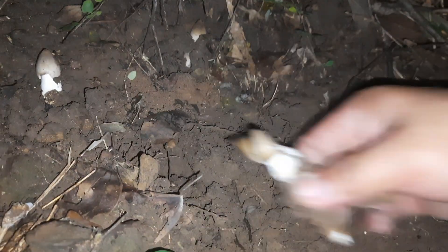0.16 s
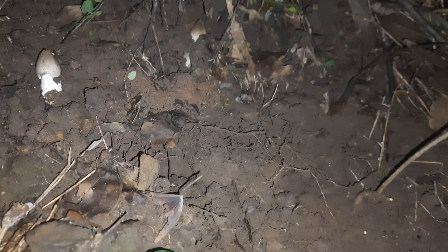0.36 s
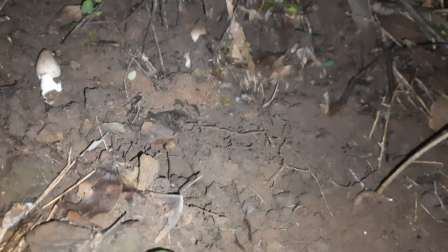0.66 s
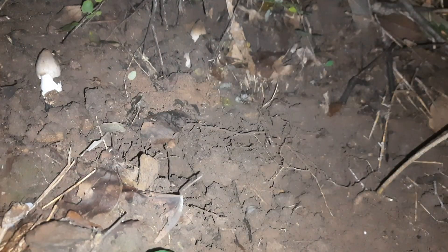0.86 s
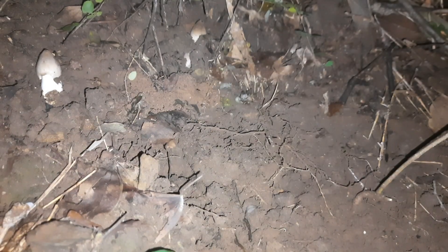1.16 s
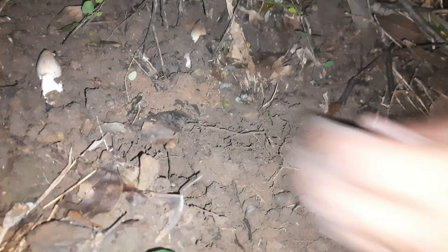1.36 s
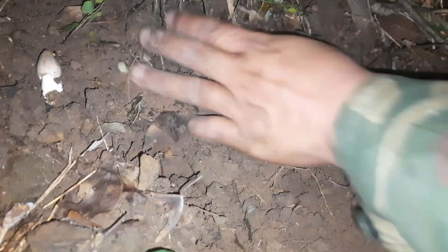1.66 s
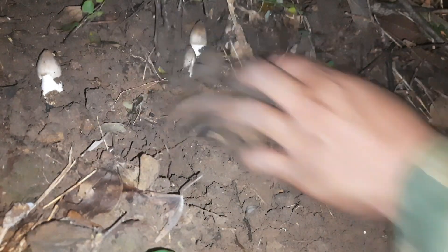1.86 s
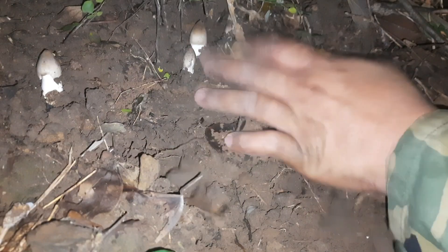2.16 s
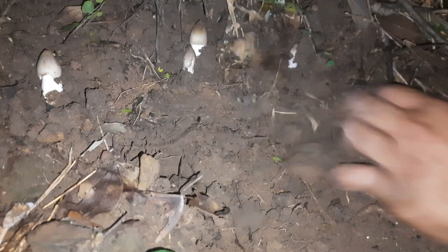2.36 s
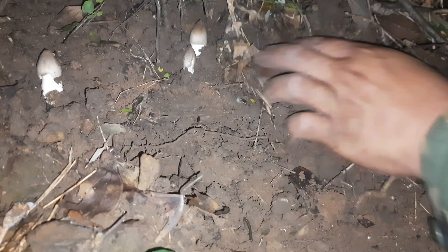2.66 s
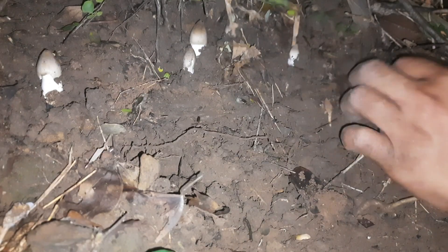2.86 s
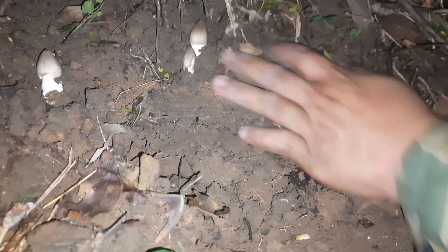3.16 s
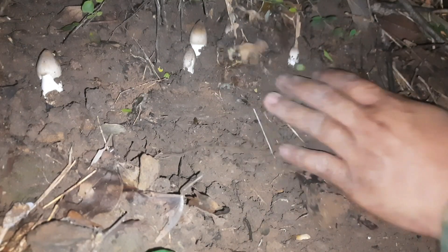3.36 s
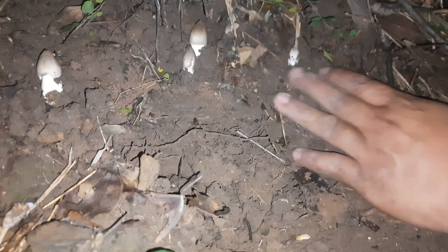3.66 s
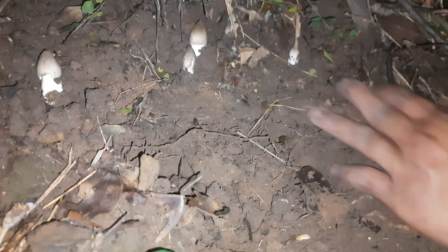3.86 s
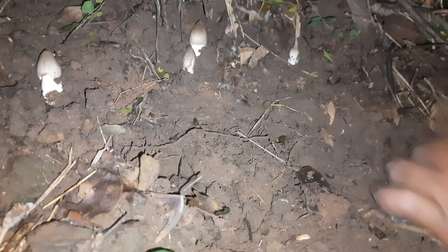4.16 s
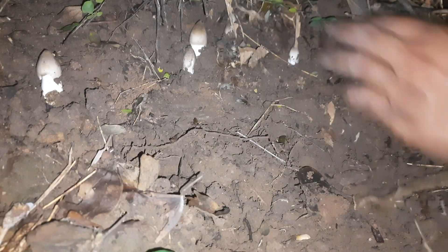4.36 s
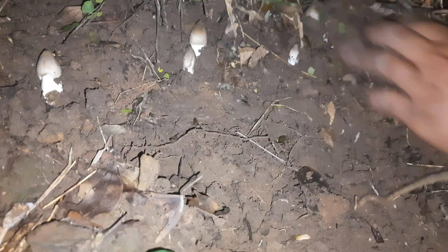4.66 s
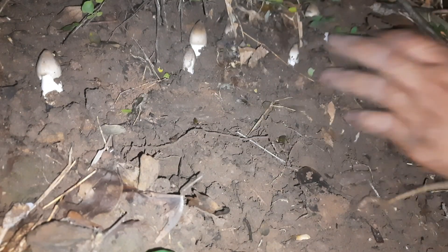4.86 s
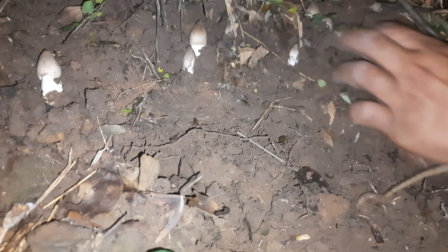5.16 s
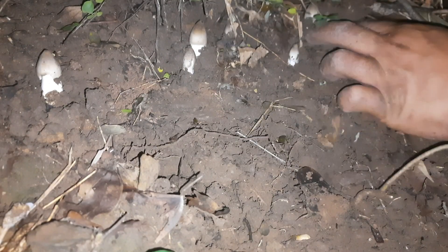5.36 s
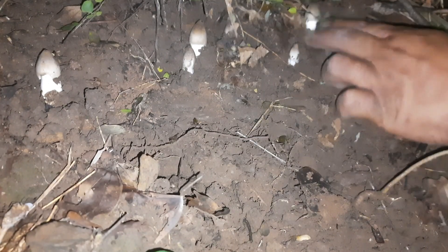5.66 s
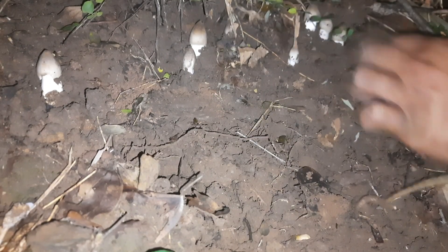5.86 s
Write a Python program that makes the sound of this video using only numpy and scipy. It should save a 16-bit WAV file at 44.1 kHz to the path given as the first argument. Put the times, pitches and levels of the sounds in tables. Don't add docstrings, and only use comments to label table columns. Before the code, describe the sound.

A stereo microphone lies on the soil with a hand working just beside it. Short rasping strokes, pebble clicks and brittle snaps come irregularly, separated by quiet trickles of crumbs. Some strokes land as hollow slaps with a soft low thump in the earth. A sleeve brushes softly, a heel scuffs dully, and faint air and a far cricket chirp sit behind.

```python
import sys
import numpy as np
from scipy import signal
from scipy.io import wavfile
from scipy.ndimage import uniform_filter1d

SR = 44100
rng = np.random.default_rng(int(sys.argv[2]) if len(sys.argv) > 2 else 0)


def volts(x):
    e = np.asarray(x, float) / 20
    return 10 ** e


def digitize_waveform(pressure):
    field = np.atleast_2d(pressure).T
    bounded = np.clip(field, -1, 1)
    quanta = np.round(bounded * 32767).astype(np.int16)
    wavfile.write(sys.argv[1], SR, quanta)


N = 265923

# f/Hz, level/dB
GRIT = [(300, 9), (700, -3), (1100, 2.5), (1600, 7), (1950, 0.5), (2350, -1), (3100, -1), (3700, 3.5),
        (4500, 3), (10000, 0.5), (15000, 1)]
# t/s, peak/dB, fine grit above the peak/dB
TWIGS = [(0.3364, -37, -23), (0.538, -21, 4), (0.7633, -25, 7), (0.884, -40.5, 12), (1.262, -33.5, 5.5),
         (1.3628, -30.5, 19.5), (1.371, -44, -6), (1.3868, -13, -34), (1.6876, -36.5, -20), (1.733, -37, 7),
         (2.8413, -37.5, 5), (2.872, -34.5, 10), (2.9155, -29, 7.5), (2.941, -23.5, 0), (2.972, -35, 11.5),
         (3.0188, -46, 14), (3.029, -50, 7), (2.926, -36, 2), (3, -37, 4), (2.833, -39, 0),
         (5.797, -25.5, 5), (5.808, -26.5, 13.5), (4.972, -24.5, -1), (3.043, -40, 2), (3.7847, -38, 18),
         (4.1861, -23, 1), (4.1917, -21, 7), (4.339, -33, 7), (4.5296, -29.5, 5.5), (4.6023, -29, -10),
         (4.613, -39, 1), (4.945, -35, 7.5), (4.9597, -14, -37), (5.7206, -55, 26), (5.733, -49, 18)]
# t/s, peak/dB, fine grit above the peak/dB
CLODS = [(0.516, -35, 16), (0.524, -35.5, 18.5), (0.784, -31, -10), (0.804, -27.5, -4), (0.8255, -24.5, 0),
         (0.8213, -32, -6), (.7555, -41, -15), (0.8537, -26, -12), (0.8582, -30, -1), (0.8687, -29.5, -6),
         (.864, -35, 2), (0.895, -43.5, 9), (0.969, -37.5, 17.5), (1.3482, -15.5, -1), (2.5697, -40, 17.5),
         (2.5788, -12.5, -6.5), (2.7729, -37, 7.5), (2.828, -28, -3), (2.9344, -27.5, -1),
         (2.958, -30.5, 7.5), (2.987, -32.5, 7.5), (3.458, -40.5, 9), (3.4629, -20, 5), (3.752, -35, 11),
         (3.762, -32.5, 7), (4.333, -32, -1), (4.4755, -52, -9), (4.494, -33.5, 2), (4.502, -39, 14),
         (4.51, -49, 5), (5.787, -48, -14), (5.8, -49, -18)]
# t/s, half length/s, level/dB, mid rustle above it/dB
MOVES = [(0.07, 0.033, -64, -6), (4.038, 0.08, -61, 3), (.01, 0.41, -64.5, 6.5), (0.586, 0.029, -57.5, -8),
         (3.765, 0.16, -67, -2.5), (4.698, 0.041, -56, 5), (5.28, 0.1, -66.5, -2.5),
         (5.687, 0.062, -61.5, 0.5), (6., 0.19, -68, 6), (0.156, 0.05, -55, -9),
         (0.263, 0.085, -58.5, 11.5), (0.389, 0.079, -53.5, 1.5), (0.694, 0.23, -70.5, 6),
         (0.995, 0.25, -58.5, -30), (1.14, 0.086, -60, 2.5), (1.29, 0.14, -64.5, 17),
         (1.386, 0.14, -53, -7), (1.57, 0.12, -60.5, 5.5), (1.795, 0.26, -59.5, 1.5),
         (2.104, 0.3, -65, -8.5), (2.32, 0.1, -60, 2), (2.497, 0.051, -73.5, 2.5), (2.895, 0.21, -52, -7),
         (3.28, 0.089, -63.5, 2), (3.524, 0.069, -56.5, 0.5), (3.903, 0.19, -62, -6),
         (4.26, 0.088, -59.5, -1.5), (4.56, 0.18, -55, -2), (5.058, 0.13, -62, 0.5),
         (5.466, 0.098, -60.5, 1.5), (5.828, 0.072, -52, -4.5)]


def evened(x):
    return x / np.sqrt(np.mean(x ** 2) + 1e-20)


def add(mix, s, sound):
    part = mix[..., round(s * SR):][..., :sound.shape[-1]]
    part += sound[..., :part.shape[-1]]


def coloured(x, points):
    hz, db = np.transpose(points)
    bins_hz = abs(np.fft.fftfreq(8192, 1 / SR))
    log_gain = np.interp(np.log(bins_hz + 1), np.log(hz), db) * np.log(10) / 20
    taps = np.fft.ifft(np.exp(np.conj(signal.hilbert(log_gain)))).real[:4096]
    taps = taps.reshape((1,) * (x.ndim - 1) + (-1,))
    return signal.oaconvolve(x, taps, axes=-1)[..., :N]


def band(x, lo_hz, hi_hz):
    sos = signal.butter(1, [lo_hz, hi_hz], "band", fs=SR, output="sos")
    return evened(signal.sosfiltfilt(sos, x))


def wander(seconds, channels=1):
    size = max(int(seconds * SR), 2)
    noise = rng.standard_normal((channels, N))
    return evened(uniform_filter1d(uniform_filter1d(noise, size), size))


def swells(rows):
    t = np.arange(N) / SR
    return sum(volts(db) * np.exp(-((t - s) / half) ** 2) for s, half, db in rows)


def resonate(x, hz, width_hz):
    turn = np.exp(2j * np.pi * np.cumsum(hz * np.ones(len(x))) / SR)
    r = np.exp(-np.pi * width_hz / SR)
    return 2 * (turn * signal.lfilter([1 - r], [1, -r], x / turn)).real


def grains(per_s, spread_db, count=8):
    size = volts(spread_db * np.minimum(rng.exponential(1, N), 4)) * rng.choice([-1., 1.], N)
    clicks = size * (rng.random(N) < per_s / SR)
    leaf = rng.integers(0, count, N // 100 + 1).repeat(100)[:N]
    t = np.arange(400) / SR
    rings = np.zeros(N)
    for k, hz in enumerate(np.geomspace(1600, 8200, count)):
        ring = volts(-60 * t / .007) * np.sin(2 * np.pi * hz * t)
        rings += signal.oaconvolve(clicks * (leaf == k), ring)[:N]
    return coloured(evened(clicks) + .25 * evened(rings), GRIT)


def layers(x):
    return np.array([band(x, 1300, 4500), band(x, 4500, 17000), band(x, 350, 1300)])


def strokes():
    # touch t/s, rise/s,
    # trail/s, pressure/dB, hollow clods above the rasp/dB
    hand_strokes = [(0.507, 0.029, 0.055, -26, -5.5), (0.76, 0.0034, 0.27, -42.5, 0),
                    (0.943, 0.036, 0.018, -52, -20), (1.249, 0.16, 0.036, -59.5, 21),
                    (1.344, 0.03, 0.081, -23.5, -27), (1.66, 0.04, 0.27, -62.5, -27),
                    (1.905, 0.053, 0.22, -58, 2), (2.29, 0.04, 0.055, -77, 24),
                    (2.5683, 0.0016, 0.11, -25, -9), (3.458, 0.0055, 0.08, -30, -7),
                    (3.734, 0.06, 0.054, -26.5, -16), (3.96, 0.032, 0.15, -76, -4),
                    (4.182, 0.0088, 0.087, -27, -8), (4.329, 0.0074, 0.052, -36, -15.5),
                    (4.469, 0.074, 0.019, -50, 8), (4.59, 0.02, 0.047, -42, -7),
                    (4.661, 0.034, 0.054, -66, -4), (4.944, 0.016, 0.09, -28.5, 0.5),
                    (5.39, 0.05, 0.077, -70.5, 19.5), (5.657, 0.038, 0.025, -69.5, 20),
                    (5.714, 0.02, 0.036, -51.5, -34.5), (5.781, 0.022, .01, -39, -2),
                    (5.796, 0.0083, 0.076, -26.5, 0),
                    (4.611, 0.0075, 0.073, -33.5, -17),
        (4.619, 0.022, 0.035, -40, -10),
              (2.82, .215, .035, -50, 3),
        (3.036, .026, .016, -43, -6),
    ]
    touch_db, leave_db = -54, -61.5
    firm_db, fine_firm_db, fine_per_db = -33, 3, 0.4855
    fine_touch_db, fine_leave_db = 8.5, -7.5
    level = np.zeros((3, N))
    for start, rise, trail, db, hollow_db in hand_strokes:
        t = np.arange(0, rise + trail, 1 / SR)
        turns_s = [0, rise, rise + trail]
        landing = t < rise
        away = np.interp(t, turns_s, [1, 0, 1]) ** np.where(landing, 1.6, 0.95)
        rasp_db = db + away * np.minimum(np.where(landing, touch_db, leave_db) - db, -8)
        fine_top_db = fine_firm_db + fine_per_db * (firm_db - db)
        fine_db = np.interp(t, turns_s, [fine_touch_db, fine_top_db, fine_leave_db])
        edges = np.clip(t / .003, 0, 1) * np.clip((turns_s[-1] - t) / .018, 0, 1)
        add(level, start, volts(np.array([rasp_db, rasp_db + fine_db, rasp_db + hollow_db])) * edges)
    clumps = volts(1.1 * wander(.003)[0]) * grains(10000, 2.2)
    return (level * layers(clumps)).sum(0) * volts(-3.5)


def snaps():
    # t/s, peak/dB, fine grit above the peak/dB
    crumbs = [(0.1116, -44, -12), (0.9583, -54, 31), (1.056, -55, 21), (1.6671, -56, -7),
              (1.741, -43.5, 19), (1.9344, -35.5, 1), (2.043, -61, 7), (2.067, -72.5, 17), (2.172, -51, 11),
              (2.177, -51.5, 15), (2.21, -61, 20), (2.332, -68, 15), (2.365, -70, 14), (2.464, -53.5, 10),
              (2.4912, -60, 15), (2.5145, -61, 15), (2.558, -58, 15.5), (1.099, -55.5, 21.5),
              (1.291, -52, 18), (2.234, -53, 23), (2.411, -51, 17), (2.415, -60, -3), (2.4308, -53, 22),
              (2.663, -38.5, 5.5), (2.888, -54, 20), (3.437, -68.5, 27), (3.694, -71, 32.5),
              (3.9766, -53, 18.5), (3.998, -62, 28), (4.043, -54.5, 22.5), (4.063, -49, 15),
              (4.119, -60, 22), (4.462, -59, 22), (4.686, -51, 14), (4.738, -56.5, 17.5), (5.95, -59.5, 14),
              (5.4206, -41, -22), (5.4756, -40.5, 0), (5.45, -60, 8), (5.572, -62, 13), (5.6655, -56, -5),
              (5.992, -60, 27.5)]
    # t/s, peak/dB, fine grit above the peak/dB
    knocks = [
        (.785, -55, 0),
        (.87, -56, 0),
        (2.5, -57, 0),
        (2.3078, -57, 20),
        (2.3, -60, 0),
        (5, -62, 0),
        (4.4, -57.5, 8),
    ]
    # hollow part above the peak/dB, t60/s
    kinds = [
        (-6, 0.04),
        (-3, 0.037),
        (-6, 0.017),
        (23.5, 0.029),
    ]
    tick_db, tick_s = 4, .0012
    level = np.zeros((3, N))
    t = np.arange(SR // 12) / SR
    for rows, (hollow_db, t60) in zip((TWIGS, CLODS, crumbs, knocks), kinds):
        fall = volts(-60 * t / np.clip(t60, .008, .05)) * np.minimum(t / .0003, 1)
        fall = fall * volts(tick_db * np.exp(-t / tick_s))
        for s, db, fine_db in rows:
            add(level, s, volts(db + np.array([[0], [fine_db], [hollow_db]])) * fall)
    grit = grains(30000, 1.5)
    return (level * layers(grit)).sum(0) * volts(-8.5)


def cracks():
    crack_db = 8
    out = np.zeros(N)
    for s, db, fine_db in TWIGS + CLODS:
        click_db = db + crack_db + .3 * np.clip(fine_db, -10, 10)
        add(out, s, volts(click_db) * np.array([1, -.6, -.4]))
    return coloured(out, GRIT)


def hollows(grit):
    # t/s, half length/s, f/Hz, level above the grit/dB
    cavities = [(2.82, 0.017, 2294, 13), (2.947, 0.039, 2340, 2), (2.954, 0.063, 4440, 9),
                (3.007, 0.0054, 4500, 15), (3.058, 0.01, 2300, 16.5), (3.783, 0.016, 2360, 5.5),
                (3.788, 0.0069, 1740, -15), (3.765, 0.0089, 600, 16), (4.206, 0.017, 2350, 8),
                (4.332, 0.014, 2330, 10), (4.516, 0.022, 2460, 2), (4.632, 0.091, 2410, 8.5),
                (4.631, 0.027, 4510, 7), (4.633, 0.023, 1420, 12.5), (1.366, 0.024, 3120, 9.5),
                (3.04, 0.021, 2990, 16), (4.63, 0.041, 3040, 9.5), (5.685, 0.023, 2240, 12),
                (5.735, .02, 2340, 13), (5.799, .012, 2276, 9), (1.272, 0.013, 4400, 22.5),
                (1.7, 0.0093, 2080, 19), (5.434, 0.017, 1690, 15), (5.488, 0.012, 1750, 15),
                (5.44, 0.026, 2650, 9), (5.67, 0.017, 1780, 2)]
    out = grit.copy()
    for s, half, hz, db in cavities:
        t = np.arange(-3 * half, 3 * half, 1 / SR)
        part = grit[round((s + t[0]) * SR):][:len(t)] * np.exp(-(t / half) ** 2)
        add(out, s + t[0], volts(db) * resonate(part, hz, width_hz=100))
    return out


def slaps():
    # t/s, peak/dB, f/Hz
    palm_slaps = [(.54, -12.5, 1995), (1.387, -13, 2090), (4.19, -16, 1840), (3.4638, -14.5, 635),
                  (3.788, -26.5, 2320), (5.313, -38, 1780), (3.977, -38, 1270), (4.038, -46, 1510),
                  (4.531, -34.5, 2380), (5.734, -43, 2430), (5.801, -17, 595)]
    # t/s, peak/dB, f/Hz
    hard_slaps = [(.8038, -22.5, 2000), (.8258, -19.5, 1920), (4.9595, -9.5, 1540), (4.963, -19, 2320),
                  (4.9705, -17, 1630), (4.621, -30, 1930), (3.4640, -8.5, 1680), (3.4645, -14.5, 2250),
                  (2.5792, -9.5, 2020), (2.5815, -21, 1820), (2.5700, -19, 2100)]
    out = np.zeros(N)
    t = np.arange(SR // 25) / SR
    for rows, t60, rise in ((palm_slaps, .019, .0028), (hard_slaps, .014, .0006)):
        for s, db, hz in rows:
            fall = volts(db - 60 * t / t60) * np.minimum(t / rise, 1)
            add(out, s, fall * np.sin(2 * np.pi * hz * t))
    return out


def pebbles():
    # t/s, peak/dB
    stones = [(0.764, -26), (.8036, -26), (.8258, -35), (.8588, -27), (.8695, -36), (1.0552, -52),
              (1.072, -52), (1.1016, -50), (1.138, -51), (1.2, -54), (1.2403, -48), (2.5702, -31),
              (2.5805, -18), (2.7725, -43), (2.8288, -33), (2.8728, -37), (2.9162, -24), (2.9215, -36),
              (2.941, -31), (2.9455, -30), (2.9592, -32), (2.9745, -35), (2.9872, -38), (3.0195, -36),
              (3.464, -14), (3.464, -14), (2.5818, -24), (4.962, -25), (1.3615, -18), (1.3868, -20),
              (4.1918, -20), (5.7987, -22), (5.8058, -22), (1.741, -40), (4.6145, -30), (4.4945, -38),
              (5.421, -50), (5.476, -50), (.517, -33), (3.752, -36), (.8878, -38), (.8965, -39), (.41, -50),
              (5.9925, -49), (6.006, -58)]
    out = np.zeros(N)
    t = np.arange(300) / SR
    for s, db in stones:
        burst = np.diff(rng.standard_normal(len(t)), prepend=0)
        add(out, s, volts(db - 60 * t / .009) * burst * np.minimum(t / .0003, 1))
    return out


def thuds():
    # t/s, peak/dB, f/Hz, t60/s
    blows = [(0.52, -25, 249, 0.015), (0.533, -24.5, 185, 0.088), (0.763, -26, 182, 0.024),
             (0.825, -32.5, 281, 0.11), (1.347, -17, 137, 0.021), (1.361, -15.5, 128, 0.076),
             (1.373, -25, 149, .05), (2.579, -12, 154.6, 0.031), (4.0385, -27.5, 510, 0.0088),
             (1.487, -38, 258, 0.11), (1.561, -38.5, 226, 0.037), (3.468, -31, 180, 0.077),
             (2.826, -42, 122.6, 0.15), (2.943, -38, 189, 0.021), (3.4625, -7.5, 190, 0.018),
             (3.772, -45, 119, 0.078), (4.186, -34, 241.5, 0.13), (4.204, -14.5, 119, 0.022),
             (4.958, -18.5, 193, 0.056), (4.968, -29, 195, 0.03), (5.797, -27, 208, 0.2)]
    # t/s, peak/dB, f/Hz, t60/s
    swings = [(0.553, -26.5, 103.7, 0.11), (1.405, -23, 66.5, 0.13), (1.4865, -20.5, 126.3, 0.11),
              (1.5595, -23.5, 95, 0.096), (1.645, -32.5, 108, 0.08), (1.667, -28, 93.3, 0.13),
              (1.698, -31.5, 99, 0.1), (2.6005, -18, 85.6, 0.12), (3.485, -16.5, 98.4, 0.09),
              (4.981, -19, 93, 0.074), (5.819, -27.5, 110, 0.076)]
    out = np.zeros(N)
    t = np.arange(SR // 4) / SR
    for rows, sag, rise in ((blows, 0.39, 0.15), (swings, 0.03, 0.39)):
        for s, db, hz, t60 in rows:
            turns = np.cumsum(hz * (1 + sag * np.exp(-t / 0.0035))) / SR
            onset = np.sin(np.pi / 2 * np.minimum(t * hz / rise, 1))
            fall = volts(db - 60 * t / np.clip(t60, .012, .15)) * onset
            add(out, s, -fall * np.sin(2 * np.pi * turns))
    clock = np.arange(N) / SR
    bump = (clock > 1.45) & (clock <= 1.75)
    far = np.roll(out, 16) * volts(-32.5 * bump)
    near = out * volts(5.15 * bump)
    return np.array([volts(-.8) * far, volts(.6) * near])


def scuffs():
    # t/s, length/s, from f/Hz, to f/Hz, level/dB
    rubs = [
        (3.89, .075, 330, 640, -56),
        (2.27, .06, 450, 800, -57),
        (4.05, .035, 700, 1050, -64),
        (3.975, .035, 500, 700, -60),
    ]
    out = np.zeros(N)
    for s, length, from_hz, to_hz, db in rubs:
        u = np.arange(0, 1.3, 1 / (length * SR))
        hz = from_hz + (to_hz - from_hz) * u
        noise = rng.standard_normal(len(u))
        rub = resonate(resonate(noise, hz, 300), hz, 300)
        add(out, s, volts(db) * evened(rub) * np.interp(u, [0, 1, 1.3], [0, 1, 0]))
    return out


def stirring():
    return volts(-90) + swells([row[:3] for row in MOVES])


def litter():
    return stirring() * volts(-11.5 + 1.9 * wander(0.017)[0]) * evened(grains(3700, 1.6))


def around():
    # f/Hz, level/dB
    hiss_colour = [(300, -21), (800, -31), (1500, -5.5), (3500, -0.5), (8000, -2), (12000, -1), (16000, -6)]
    # f/Hz, level/dB
    air_colour = [(20, -33), (38, -20), (58, 1), (120, -1.5), (220, -7), (350, -16.5), (600, -39.5),
                  (1500, -48.5)]
    # f/Hz, level/dB
    rustle_colour = [(120, -15.5), (300, -5), (500, 0.5), (800, -3.5), (1300, -7), (3000, -15.5),
                     (8000, -28)]
    # t/s, half length/s, level/dB
    gusts = [
        (.3, 0.2, -62),
        (.52, 0.03, -51),
        (.96, 0.029, -60),
        (1.39, 0.014, -35),
        (1.62, 0.17, -53.5),
        (2.92, 0.072, -63),
        (3.46, 0.15, -57.5),
        (4.57, 0.068, -72),
    ]
    # t/s, half length/s, level/dB
    sleeve = [
        (.35, 0.093, -53),
        (1.52, 0.057, -54.5),
        (1.74, 0.077, -52.5),
    ]
    # t/s, half length/s, level/dB
    cricket = [
        (2.12, 0.037, -79.5),
        (4.35, 0.011, -38),
        (5.28, 0.062, -65),
    ]
    stir = stirring()
    low = volts(-54) + swells(gusts)
    mid = volts(-81.5) + swells([(s, half, db + mid_db) for s, half, db, mid_db in MOVES])
    shared = rng.standard_normal(N)
    own = rng.standard_normal((4, 2, N))
    hiss = (stir * volts(8.0) + volts(-83.0)) * coloured(own[0], hiss_colour)
    hiss *= volts(2.5 * wander(.03))
    air = low * volts(2.5 * wander(.03)) * evened(coloured(shared + .45 * own[1], air_colour))
    rustle = evened(coloured(0.56 * shared[::-1] + own[2], rustle_colour))
    rustle *= mid * volts(1.75 * wander(0.06))
    cloth = band(band(own[3], 9500, 12100), 9500, 12100)
    brush = swells(sleeve) * volts(np.array([[11.0], [8.0]])) * cloth
    chirp = swells(cricket) * band(band(shared, 6400, 6550), 6400, 6550)
    return hiss + volts(2.0) * air + volts(-3.0) * rustle + brush + chirp


def heard(x, sharp, count=6):
    # t/s, delay at the far port/samples
    far_lag = [(0, 15), (1.05, 15), (1.2, 18), (1.5, 18), (2.5, 15), (2.8, 16), (3.3, 17), (3.6, 17),
               (3.9, 16), (4.1, 14), (4.3, 14), (4.45, 17), (6.1, 18)]
    s, lag = np.transpose(far_lag)
    late = np.arange(N) - np.round(np.interp(np.arange(N) / SR, s, lag)).astype(int)
    late = np.maximum(late, 0)
    pair = np.array([x[late], x])
    out = pair + np.array([sharp[late], sharp])
    t = np.arange(SR // 12) / SR
    fall = (volts(-60 * t / .008) + volts(-30 - 60 * t / .12)) * (t > .0003)
    wash = rng.standard_normal((count, 2, len(t))) * fall
    wash = signal.lfilter([1, -.62], [1], wash)
    wash *= volts(1.2) / np.linalg.norm(wash[0, 0])
    place = np.arange(N) // 1100 % count
    for k in range(count):
        out += signal.oaconvolve(pair * (place == k), wash[k], axes=1)[:, :N]
    return out


def scene():
    grit = strokes() + snaps() + cracks() + litter()
    hand = heard(hollows(grit) + slaps(), pebbles())
    return hand + thuds() + scuffs() + around()


def low_pass(x):
    return signal.sosfilt(signal.butter(12, 17000, fs=SR, output="sos"), x)


def record(dry):
    # f/Hz, level/dB
    far_port = [(300, 1), (1000, -2.5), (1500, -2), (2400, -2.5), (3800, -8.5), (6500, -8.5), (8200, -3),
                (9200, -4.5), (10200, -8.5), (12000, -5), (15500, -4.5)]
    # f/Hz, level/dB
    near_port = [(300, 0), (1500, 0), (2400, 0), (3800, -3), (6500, -1), (7500, 2), (8050, 6), (8500, 0),
                 (9300, -12), (10000, -13), (11000, -10), (12500, -5.5), (15500, -4)]
    # f/Hz, level/dB
    treble_edge = [(15550, 0), (15750, -6), (15950, -36), (17000, -50)]
    ports = np.array([coloured(dry[0], far_port), coloured(dry[1], near_port)])
    ports = signal.lfilter(*signal.butter(2, 36, "high", fs=SR), ports)
    return low_pass(coloured(ports, treble_edge))


dry = scene()
out = record(dry)
digitize_waveform(out)
```